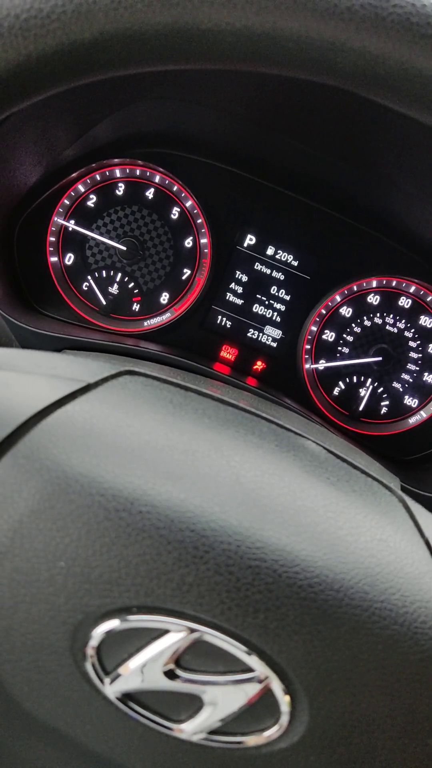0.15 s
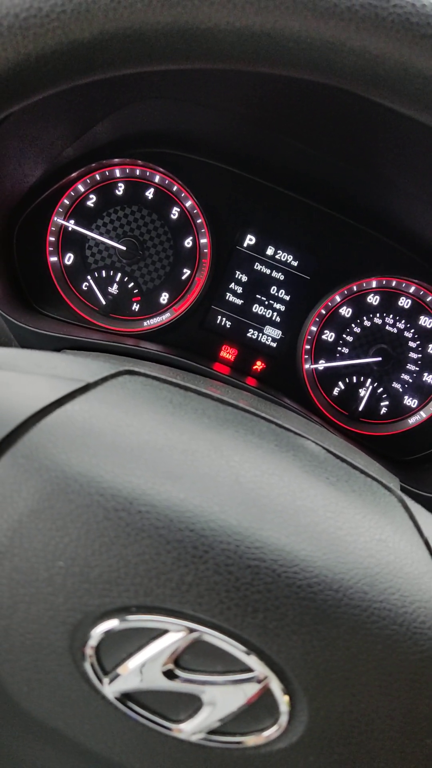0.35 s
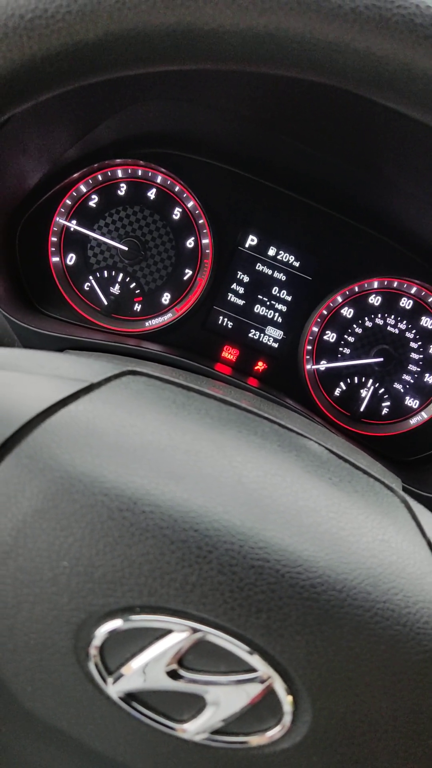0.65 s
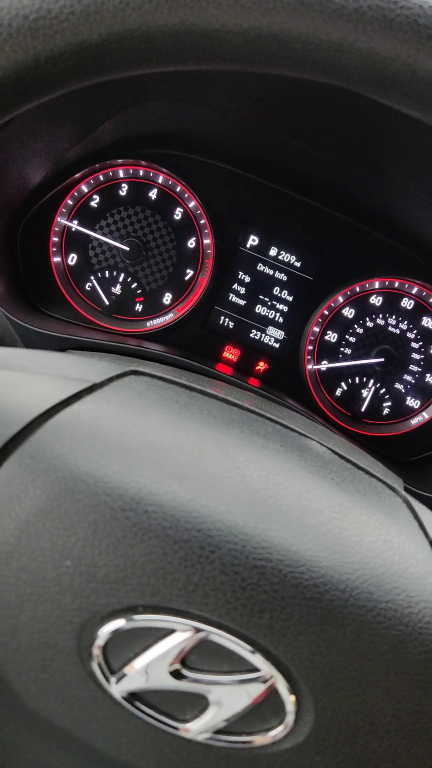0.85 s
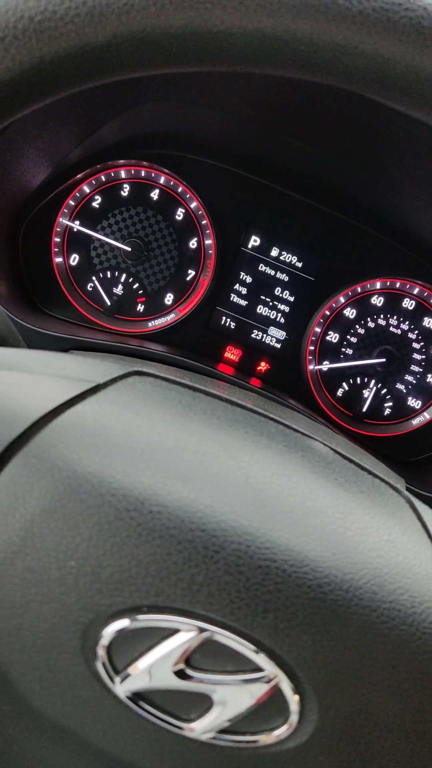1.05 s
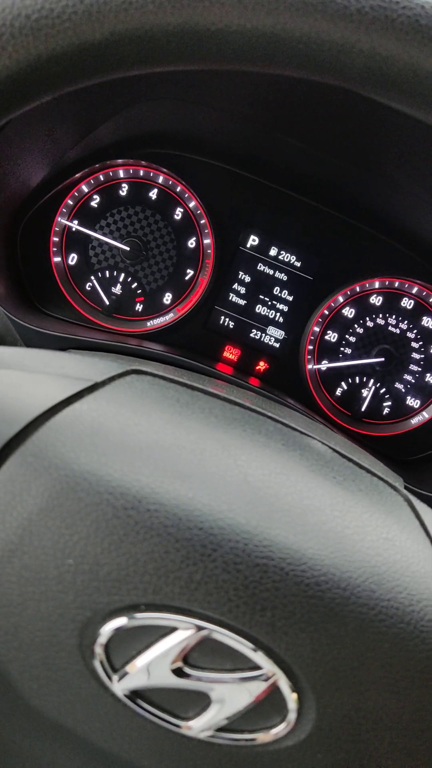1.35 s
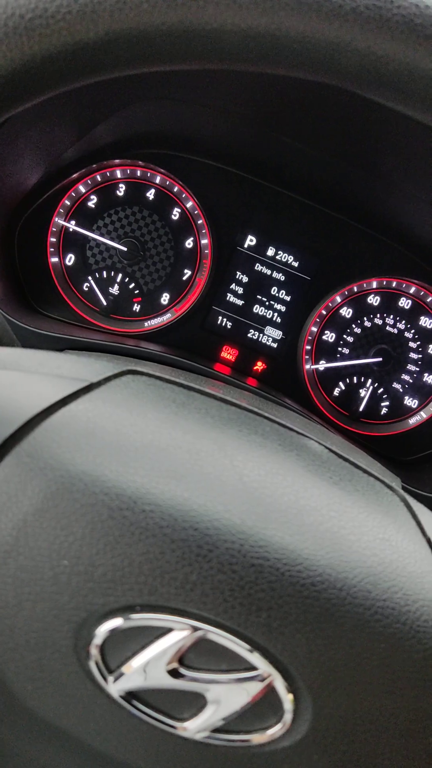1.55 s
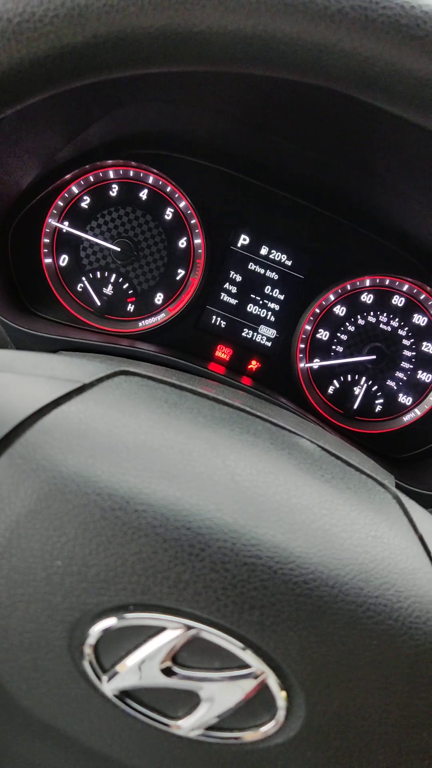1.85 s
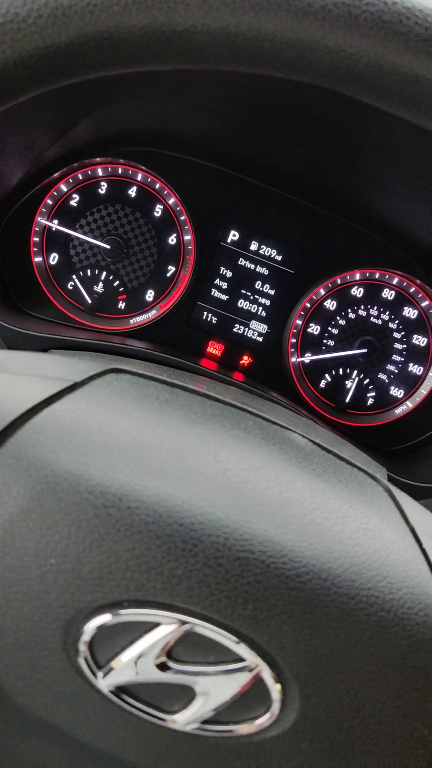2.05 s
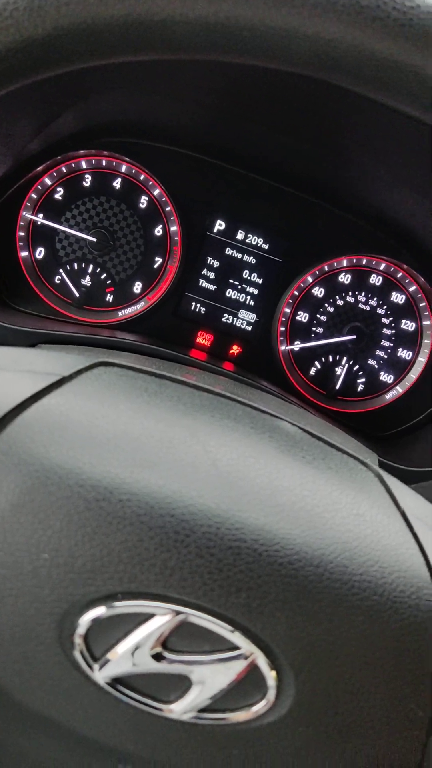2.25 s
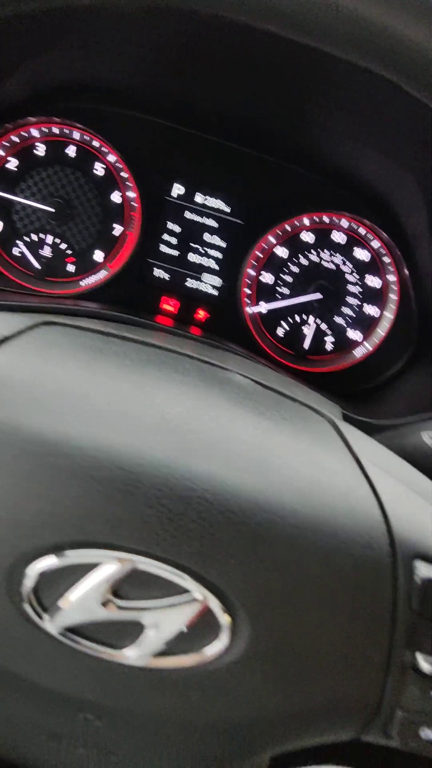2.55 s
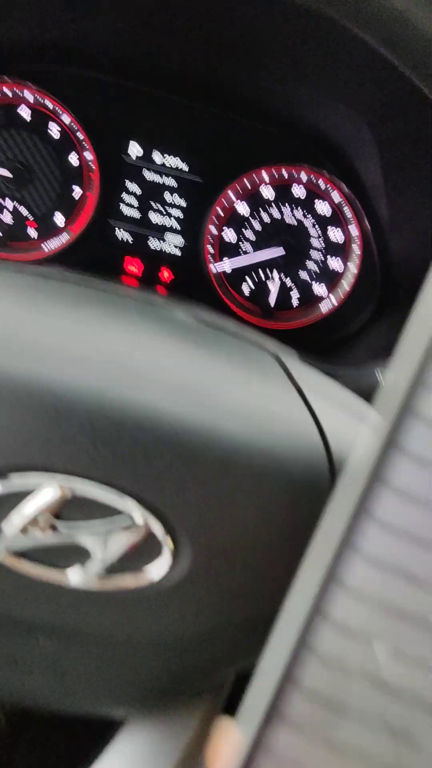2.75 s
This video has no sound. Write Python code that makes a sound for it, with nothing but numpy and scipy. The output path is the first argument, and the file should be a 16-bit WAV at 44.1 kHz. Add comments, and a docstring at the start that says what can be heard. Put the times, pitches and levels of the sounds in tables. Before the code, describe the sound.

A car engine idles steadily inside a closed cabin, a low boomy hum with faint handling ticks

```python
"""A steady engine boom is heard first: a four-cylinder car idling, from a hand-held phone in the closed cabin.
Firing orders are summed sines through the mounts; belt-driven rotors and a faster whine beat against them.
Filtered noise gives the body rumble, air and cabin resonances. Fingers crackle, rustle and tick on the phone
as grains, enveloped noise and short rings; two microphone ports each lift a treble band."""
import sys
import numpy as np
from scipy import signal
from scipy.fft import rfft, irfft
from scipy.io import wavfile
from scipy.ndimage import uniform_filter1d

SR = 44100
rng = np.random.default_rng(int(sys.argv[2]) if len(sys.argv) > 2 else 0)


def log_audio(samples):
    """Write samples as a 16-bit WAV file to the path given in sys.argv[1]."""
    # one column per channel
    frames = np.atleast_2d(samples).T
    # limit to full scale, then quantise
    limited = np.clip(frames, -1, 1)
    pcm = np.round(limited * 32767).astype(np.int16)
    wavfile.write(sys.argv[1], SR, pcm)


def how_loud(loudness_db):
    """Turn decibels into a plain amplitude multiplier (0 dB gives 1, 20 dB gives 10)."""
    steps = np.asarray(loudness_db, float) / 20
    return 10 ** steps


N = 127890


def curve(table):
    """Second column of a table, drawn in straight lines against its first column in seconds."""
    points = np.array(table, float)
    return np.interp(np.arange(N) / SR, points[:, 0], points[:, 1])


def by_hz(table, f):
    """Second column of a table against frequency, interpolated along log frequency."""
    points = np.array(table)
    return np.interp(np.log(f), np.log(points[:, 0]), points[:, 1])


def walk(rate):
    """Slow random wander with about `rate` new values per second and a spread near 1."""
    hold = int(SR / rate)
    steps = np.repeat(rng.standard_normal(N // hold + 1), hold)
    return 1.71 * uniform_filter1d(uniform_filter1d(steps, hold), hold)[:N]


def colour(x, gain):
    """Filter by a gain given as a function of Hz."""
    f = np.maximum(np.arange(N // 2 + 1) * SR / N, 1)
    return irfft(rfft(x) * gain(f), N)


def resonance(hz, width):
    """Band-pass response of a single resonance, gain 1 at the centre."""
    return lambda f: 1 / (1 + 1j * (f ** 2 - hz ** 2) / (f * width))


def pan(db):
    """Left and right gains for a left-minus-right level in dB."""
    return how_loud(np.array([[db / 2], [-db / 2]]))


def tone(turns, db):
    """Sine with its phase in turns and its level in dB rms."""
    return 2 ** .5 * how_loud(db) * np.sin(2 * np.pi * turns)


# Idle speed: start_s, firing_hz
IDLE_SPEED = [(0, 33.37), (.2, 33.37), (.4, 33.4), (.6, 33.11), (.8, 33.12), (1.0, 33.28), (1.2, 33.28),
              (1.4, 33.01), (1.6, 33.0), (1.8, 32.85), (2.0, 32.83), (2.2, 32.91), (2.4, 32.94),
              (2.9, 32.92)]


def firing_turns():
    """Running count of firings: the firing rate integrated over time."""
    start_turns = -.106
    return np.cumsum(curve(IDLE_SPEED)) / SR + start_turns


# Engine load on the mounts: start_s, gain_db
MOUNT_LOAD = [(0, -0.5), (.7, 0), (1.3, 0), (1.7, 1.2), (2.3, 0.1), (2.9, 1)]
# Firing orders before load: quarters of the firing rate (count) -> level_db (rms), left_minus_right_db, waver_db
FIRING_ORDERS = {3: (-64, 0, 2), 4: (-35, 1.3, .5), 5: (-65, 0, 2), 6: (-59.5, 0, 1.5), 7: (-69, 0, 2),
                 8: (-49.7, 0, .7), 11: (-68, 0, 2), 12: (-44.3, -.5, .9), 14: (-73, 0, 2),
                 16: (-50.3, -1.9, .8), 18: (-71, -1, 2), 20: (-66, -2, 2), 21: (-72, -1, 2),
                 22: (-69, -1, 2), 24: (-72, 0, 2), 40: (-76, 2, 2)}


def firing_orders(firings):
    """Combustion pulses reach the body through the mounts as sines at quarter multiples of the firing rate."""
    mount_lead_rad = 2.64
    orders = 0
    for quarters, (db, left_right_db, waver_db) in FIRING_ORDERS.items():
        multiple = quarters / 4
        # Orders below the mount resonance lead; the lead fades out by twice the firing rate
        lead_turns = np.clip(2 - multiple, 0, 1) * mount_lead_rad / (2 * np.pi)
        order = tone(multiple * firings + lead_turns, db + waver_db * walk(9))
        orders = orders + pan(left_right_db) * order
    return orders * how_loud(curve(MOUNT_LOAD))


# Belt-driven rotor, slipping a little: start_s, turns_per_s
BELT_SPEED_CURVE = [(0, 20.615), (.8, 20.625), (1.1, 20.57), (1.45, 20.55), (1.8, 20.5), (2.2, 20.48),
                    (2.9, 20.45)]
# Its harmonics before waver: harmonic (count) -> level_db (rms)
BELT_HARMONICS = {2: -57, 3: -52, 4: -52.5, 5: -65, 7: -60, 8: -61.5, 9: -73, 10: -69, 11: -77, 12: -76}


def belt_rotor():
    """A rotor on the slipping belt sounds harmonics of its own speed, which beat against the engine."""
    start_turns, lead_turns, waver_db = -.01, .29, .8  # the lead is the same for every harmonic
    belt = np.cumsum(curve(BELT_SPEED_CURVE)) / SR + start_turns
    return sum(tone(k * belt + lead_turns, db + waver_db * walk(3.93)) for k, db in BELT_HARMONICS.items())


# Faster rotor tones inside the cabin resonance, before waver: multiple (of the firing rate), level_db (rms)
WHINE_TONES = [(10.43, -68.5), (10.92, -68.5), (11.41, -62.5), (11.87, -66), (12.38, -78)]


def whine(firings):
    """A faster rotor whines between the orders, its tone flanked by side tones about half an order apart, with
    unsteady phase and the left ear leading."""
    jitter_turns, left_lead_turns, waver_db = .08, .1, .8
    ear_lead = np.array([[left_lead_turns], [0]])
    tones = 0
    for multiple, db in WHINE_TONES:
        turns = multiple * firings + jitter_turns * walk(12) + ear_lead
        tones = tones + tone(turns, db + waver_db * walk(3.4))
    return tones


# Second belt-driven rotor, before waver: harmonic (count) -> level_db (rms)
PUMP_HARMONICS = {2: -59, 3: -69, 4: -64, 6: -76}


def pump_rotor(firings):
    """A second belt-driven rotor turns at a fixed ratio to the firings, so its harmonics beat against them."""
    turns_per_firing, start_turns, waver_db = 1.136, -.135, .8
    pump = turns_per_firing * firings + start_turns
    return sum(tone(k * pump, db + waver_db * walk(3.9)) for k, db in PUMP_HARMONICS.items())


def engine():
    """Firing orders with the rotors that beat against them."""
    firings = firing_turns()
    return firing_orders(firings) + belt_rotor() + whine(firings) + pump_rotor(firings)


# Body rumble and air noise before flicker and balance: pitch_hz, density_db (per Hz)
RUMBLE_SPECTRUM = [(10, -68), (20, -70), (30, -75), (50, -77), (100, -79), (150, -77.5), (200, -83),
                   (250, -86.5), (300, -83.5), (450, -85), (700, -89), (950, -89), (1200, -94),
                   (2500, -100), (5000, -106), (8000, -109), (14500, -113)]
# Likeness of left and right: pitch_hz, likeness (0-1)
STEREO_LIKENESS = [(10, 1), (120, 1), (250, 0.72), (600, 0.5), (1000, 0), (15000, 0)]
# Balance of the noise: pitch_hz, left_minus_right_db
NOISE_BALANCE = [(10, -13), (150, -9), (300, 3), (550, 7), (700, -1.5), (2000, -1), (5000, -1.5),
                 (14000, 4)]
# Flicker of each noise band: low_hz, high_hz, depth_db (for each of two wanders), changes_per_s
NOISE_FLICKER = [(0, 450, .3, 14), (450, 1400, .6, 25), (1400, 4000, .8, 25), (4000, 22050, .5, 18)]


def rumble():
    """Broad body and air noise: its bands flicker, the bass is alike in both ears and the treble spreads."""
    white = rng.standard_normal((2, N))
    shared = walk(20)  # wander common to all bands
    noise = 0
    for low_hz, high_hz, depth_db, rate in NOISE_FLICKER:
        band = colour(white, lambda f: (f > low_hz) & (f <= high_hz))
        noise = noise + band * how_loud(depth_db * (shared + walk(rate)))

    def spread(sign):
        """Gain of the mid (+1) or side (-1) noise; the likeness sets their share of the power."""
        def gain(f):
            like = np.clip(by_hz(STEREO_LIKENESS, f), 0, 1)
            return how_loud(by_hz(RUMBLE_SPECTRUM, f)) * np.sqrt(SR / 4 * (1 + sign * like))
        return gain

    mid, side = colour(noise[0], spread(1)), colour(noise[1], spread(-1))
    left = colour(mid + side, lambda f: how_loud(by_hz(NOISE_BALANCE, f) / 2))
    right = colour(mid - side, lambda f: how_loud(-by_hz(NOISE_BALANCE, f) / 2))
    return np.array([left, right])


# Cabin resonances: pitch_hz, width_hz (of each of two passes), left_db (rms), right_db (rms)
CABIN_MODES = [(378, 30, -72, -66), (349, 55, -65, -80.5), (920, 140, -70, -79.5)]


def cabin():
    """Air modes of the closed cabin: noise passed twice through each resonance."""
    modes = 0
    for hz, width_hz, left_db, right_db in CABIN_MODES:
        ring = colour(rng.standard_normal(N), lambda f: resonance(hz, width_hz)(f) ** 2)
        modes = modes + ring / ring.std() * how_loud(np.array([[left_db], [right_db]]))
    return modes


def low_rub(x):
    """Wide double resonance that gives finger noise its low body."""
    return colour(x, lambda f: resonance(1600, 6500)(f) ** 2)


def crackle(grit):
    """Sparse faint grains at random instants, each a short decaying burst of grit."""
    grains_per_s, floor_db, mean_excess_db, decay_s = 40, -74, 2.5, .003  # levels before the filter
    level = how_loud(floor_db + mean_excess_db * rng.exponential(size=N))
    spikes = (rng.random(N) < grains_per_s / SR) * level
    envelope = signal.lfilter([1], [1, -np.exp(-1 / (decay_s * SR))], spikes)
    return low_rub(envelope * grit)


# Finger rustles, levels before envelope and filter: start_s, attack_s, decay_s, bright_db, low_db
FINGER_RUSTLES = [(.09, .002, 0.02, -66, -57.5), (.415, 0.0022, 0.01, -67, -50.5),
                  (0.452, 0.0027, 0.011, -72, -47.5), (.71, .002, 0.016, -74, -65),
                  (1.05, 0.0022, 0.031, -65, -52.5), (1.155, .002, .006, -63, -57),
                  (1.6283, 0.00079, 0.012, -52.5, -47.5), (1.74, .002, 0.055, -62, -55.5),
                  (1.92, .002, 0.014, -75, -52.5), (1.949, 0.0035, 0.013, -74, -54),
                  (2.035, .002, .01, -74, -53.5), (2.158, 0.0055, 0.015, -67, -51),
                  (2.34, 0.007, 0.02, -63, -53), (2.512, .002, 0.011, -61, -71),
                  (2.531, .015, 0.015, -43, -65), (2.566, .002, 0.0073, -72, -50),
                  (2.629, .002, 0.022, -73, -55.5), (2.84, 0.0027, 0.0069, -55, -43)]


def rustles(grit):
    """Skin rubs the phone: dense grit under a quick swell and decay, split into bright and low parts."""
    t = np.arange(N) / SR
    bright, low = np.zeros((2, N)), np.zeros((2, N))
    for start_s, attack_s, decay_s, bright_db, low_db in FINGER_RUSTLES:
        u = np.maximum(t - start_s, 0)
        rub = grit * (1 - np.exp(-u / max(attack_s, 1 / SR))) * np.exp(-u / decay_s)
        bright = bright + rub * how_loud(bright_db)
        low = low + rub * how_loud(low_db)
    return colour(bright, lambda f: resonance(8800, 7500)(f) ** 2) + low_rub(low)


# Finger ticks, levels before envelope and pan:
# start_s, ring_db, ring_hz, low_db, low_hz, left_minus_right_db
FINGER_TICKS = [(.458, -62, 7500, -52, 1300, -3), (.9370, -38.5, 9240, -75, 2600, 3),
                (1.226, -44.5, 9000, -70, 2600, 2), (1.2658, -57, 10300, -79, 2580, -2),
                (1.5656, -47.5, 12100, -47, 2500, 5), (1.5674, -51, 7450, -63, 2600, -2),
                (1.629, -49, 12600, -68, 2600, 9), (1.6292, -40, 9300, -55, 4400, 5),
                (1.6334, -40.5, 7260, -52, 5100, 4), (1.639, -58, 11900, -58, 4000, 2),
                (2.8497, -68, 8000, -50, 2500, 0)]


def ticks(white):
    """A fingertip tap rings briefly at a high and a lower pitch, then leaves a decaying noisy tail."""
    rise_s, ring_s = .00006, .0004
    tail_db, tail_t60_s, tail_hz, tail_width_hz = -13, .06, 9500, 4500  # tail_db: relative to ring_db
    t = np.arange(N) / SR
    rings, tails = 0, 0
    for start_s, ring_db, ring_hz, low_db, low_hz, left_right_db in FINGER_TICKS:
        u = np.maximum(t - start_s, 0)
        envelope = 2 * (1 - np.exp(-u / rise_s)) * np.exp(-u / ring_s)
        high = how_loud(ring_db) * np.sin(2 * np.pi * ring_hz * u)
        low = how_loud(low_db) * np.sin(2 * np.pi * low_hz * u)
        rings = rings + pan(left_right_db) * envelope * (high + low)
        decay = np.exp(-np.log(1000) * u / tail_t60_s)
        tails = tails + (t >= start_s) * how_loud(ring_db + tail_db) * decay * white
    return rings + colour(tails, lambda f: resonance(tail_hz, tail_width_hz)(f) ** 2)


def fingers():
    """Crackle, rustles and ticks of fingers on the phone, all drawn from one stereo noise."""
    white = rng.standard_normal((2, N))
    grit = white * how_loud(2.5 * walk(300))  # fast level wander roughens the noise
    return crackle(grit) + rustles(grit) + ticks(white)


def scene():
    """Everything that reaches the phone."""
    return engine() + rumble() + cabin() + fingers()


# Microphone ports, left then right: pitch_hz, width_hz, gain_db
MICROPHONE_PORTS = [(11000, 1100, 6), (8600, 840, 12)]


def microphones(dry):
    """Each port resonates and lifts its own treble band; a steep low-pass cuts the top."""
    lifted = []
    for channel, (hz, width_hz, gain_db) in zip(dry, MICROPHONE_PORTS):
        lifted.append(colour(channel, lambda f: 1 + (how_loud(gain_db) - 1) * resonance(hz, width_hz)(f)))
    top_hz = 14250
    low_pass = signal.ellip(10, .3, 70, top_hz, fs=SR, output="sos")
    return signal.sosfilt(low_pass, np.array(lifted))


def band_limit(x):
    """A steep low-pass at the top of the band."""
    return signal.sosfilt(signal.butter(12, 14650, fs=SR, output="sos"), x)


def record(dry):
    """The phone takes in the scene through its two microphone ports."""
    mix = microphones(dry)
    return band_limit(mix)


dry = scene()
out = record(dry)
log_audio(out)
```